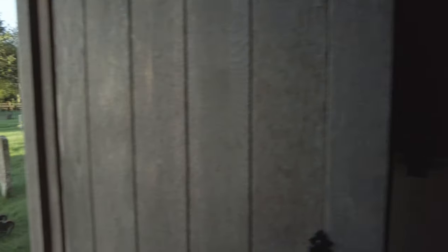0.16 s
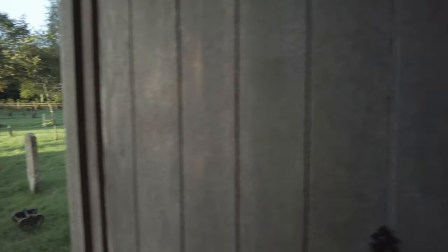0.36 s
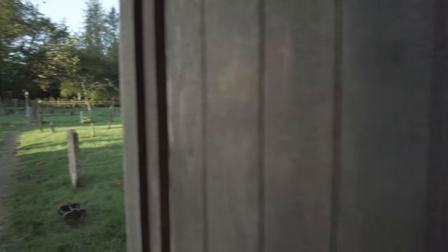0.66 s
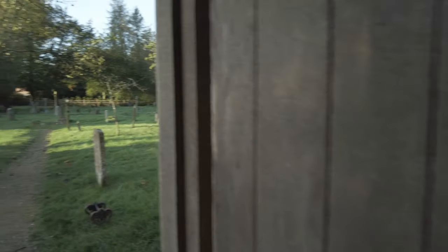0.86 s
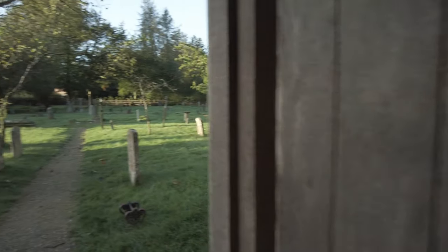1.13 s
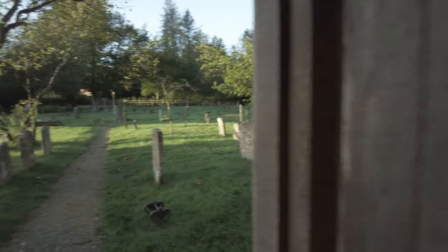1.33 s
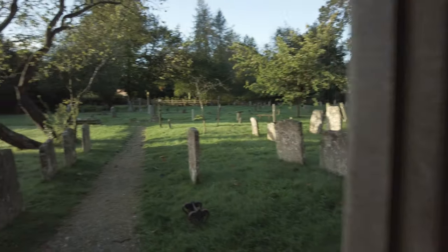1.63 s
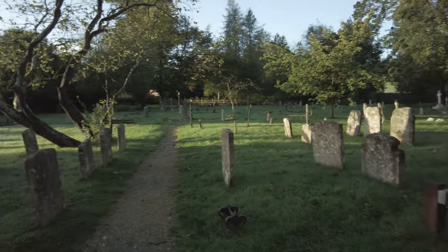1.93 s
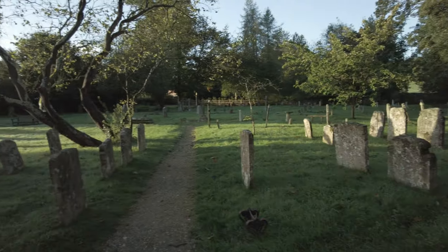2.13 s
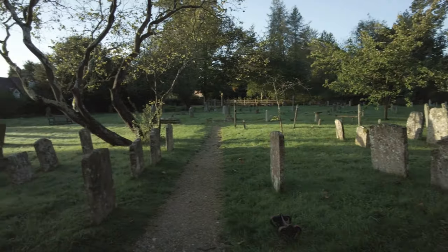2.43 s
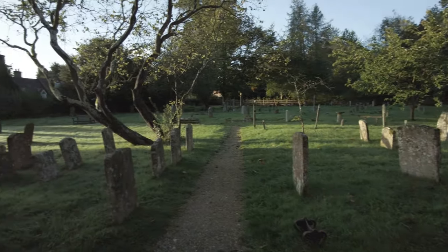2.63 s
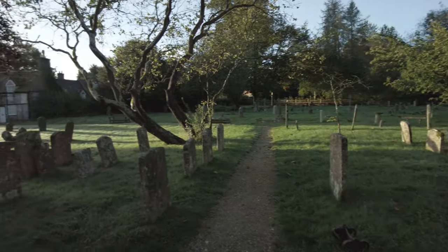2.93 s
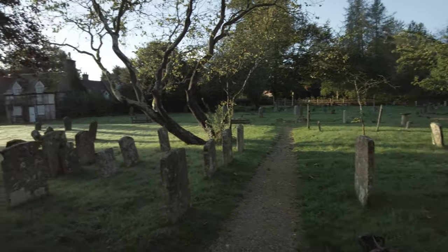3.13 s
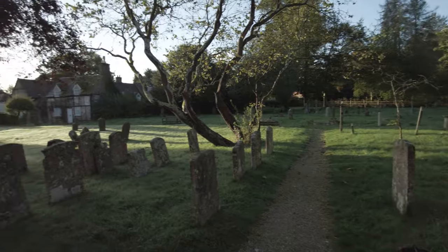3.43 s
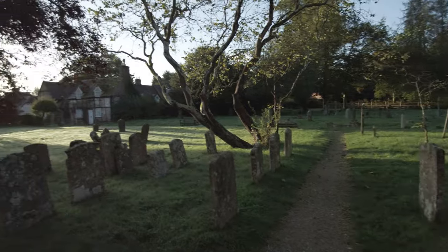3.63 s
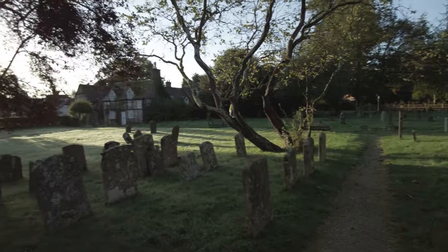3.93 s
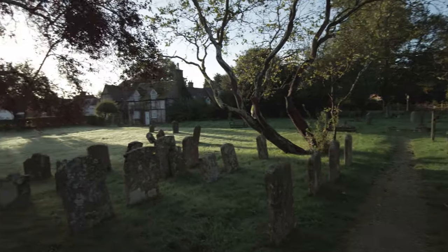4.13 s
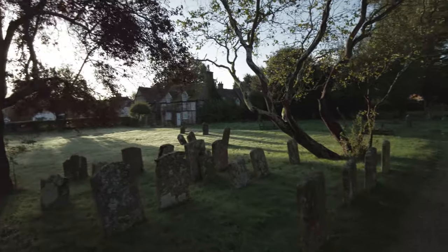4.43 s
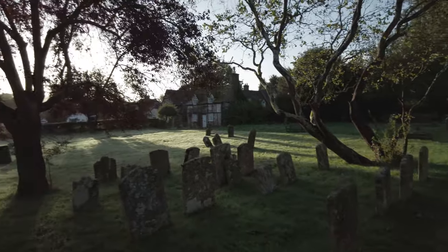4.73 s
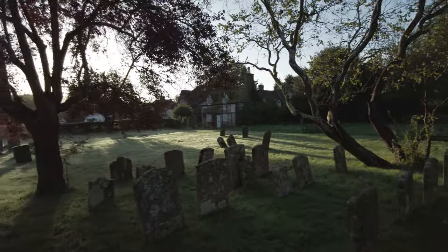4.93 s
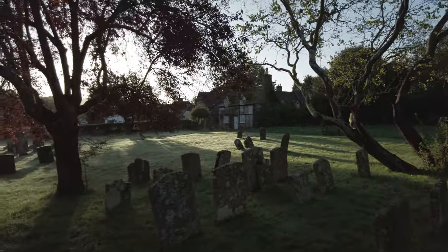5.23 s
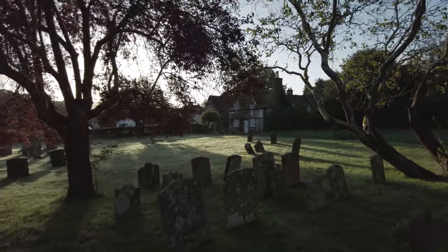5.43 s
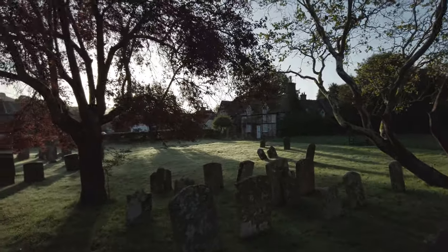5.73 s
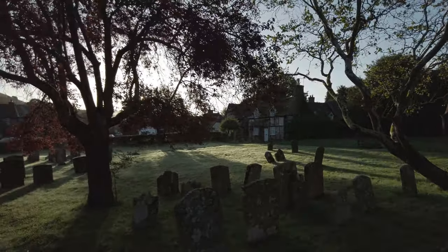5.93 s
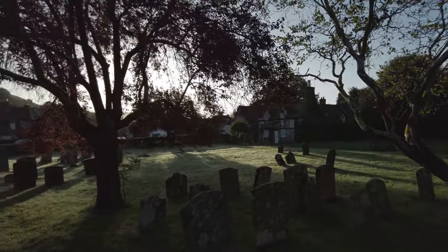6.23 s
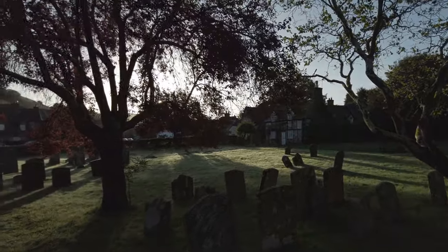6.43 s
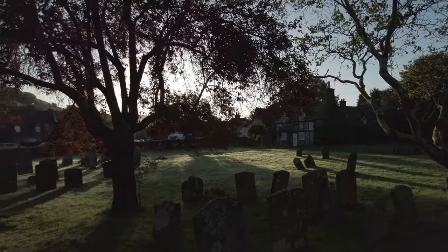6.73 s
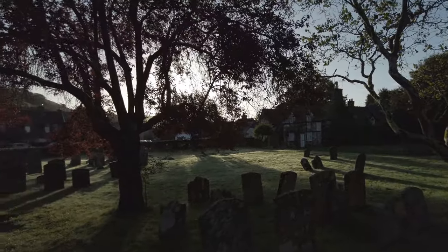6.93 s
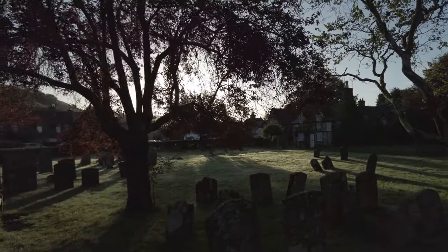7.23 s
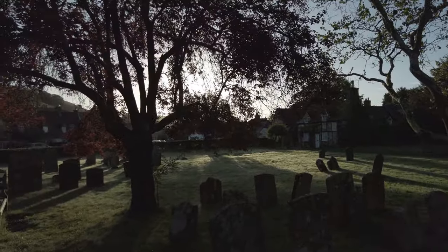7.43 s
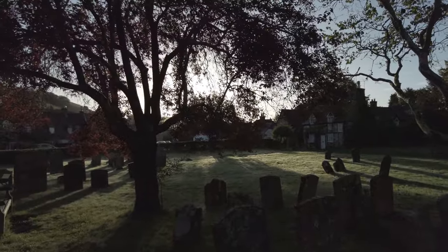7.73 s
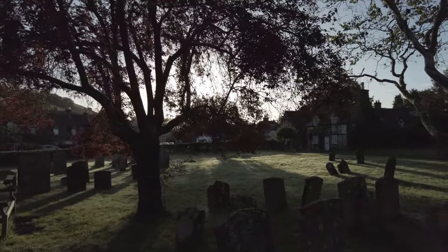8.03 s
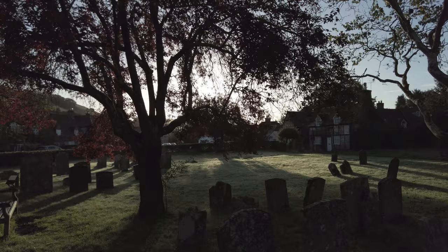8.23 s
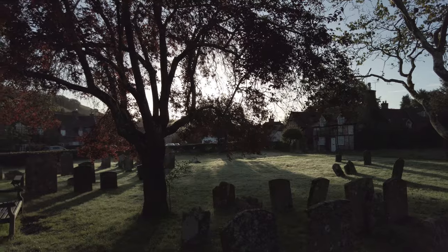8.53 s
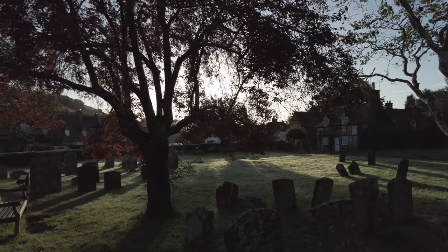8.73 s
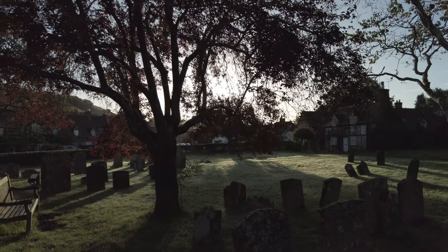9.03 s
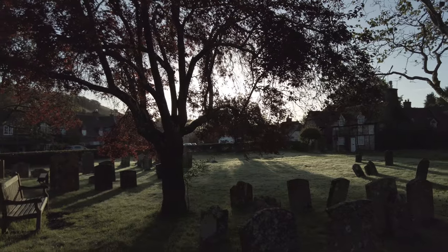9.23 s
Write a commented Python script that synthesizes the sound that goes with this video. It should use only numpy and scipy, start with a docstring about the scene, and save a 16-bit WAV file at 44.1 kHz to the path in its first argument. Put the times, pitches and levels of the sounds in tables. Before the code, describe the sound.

Small birds chirp, trill and whistle throughout in a quiet village churchyard, one nearer bird repeating a high double note. Rooks caw farther off and a pigeon coos very faintly midway, over a steady low rumble of distant traffic. Close to the hand-held microphone, sleeves rustle softly, two dull footsteps thud early on, and the plastic camera body gives a few sharp knocks, loudest near three and eight seconds.

```python
"""Small birds whistle and trill in a churchyard at dawn, and one repeats a loud double note.
Each whistle is a gliding sine tone, roughened by amplitude modulation and scattered by the trees.
Far off, rooks caw in harmonics shaped by the throat, a pigeon coos and traffic rumbles as low noise.
Close by, steps thud, sleeves rustle and the plastic shell of a hand-held camera rings when knocked."""
import sys
import numpy as np
from scipy import signal
from scipy.io import wavfile
from scipy.ndimage import uniform_filter1d

SR = 44100
rng = np.random.default_rng(int(sys.argv[2]) if len(sys.argv) > 2 else 0)


def file_out(sig):
    """Save sig as 16-bit WAV at sys.argv[1]."""
    # one column per channel
    cols = np.atleast_2d(sig).T
    # limit, then scale
    lim = np.clip(cols, -1, 1)
    pcm = np.round(lim * 32767).astype(np.int16)
    wavfile.write(sys.argv[1], SR, pcm)


N = 413216

# distant traffic: time_s, rumble_db, drone_db, hum_db
TRAFFIC_LEVELS = [(0.0, -56, -56.5, -66), (.9, -52.5, -53.5, -62), (2.0, -44.5, -56.5, -58),
                  (2.7, -43.5, -53.5, -53.5), (3.8, -46.5, -53, -57.5), (4.6, -47, -54.5, -57.5),
                  (5.3, -49, -55.5, -64), (6.2, -43.5, -54, -65), (6.94, -44.5, -64, -65),
                  (8.3, -45.5, -60.5, -64), (9.37, -47, -61, -59)]
HALF_EACH_SIDE = np.array([[.5], [-.5]])  # splits a left-right difference between the channels


def gain_of(db):
    """Amplitude ratio: a factor of ten for every 20 dB."""
    return 10 ** (np.asarray(db) / 20)


def unit_rms(x):
    """Normalisation to a mean power of one."""
    return x / np.sqrt(np.mean(x ** 2) + 1e-20)


def spectrum_at(points, hz):
    """Interpolation on a logarithmic frequency axis."""
    points_hz, value = np.transpose(points)
    return np.interp(np.log(hz + 1), np.log(points_hz + 1), value)


def curve(rows, column):
    """Linear interpolation of one column over time."""
    rows = np.array(rows)
    return np.interp(np.arange(N) / SR, rows[:, 0], rows[:, column])


def add(mix, start_s, sound):
    """Superposition: a sound adds to the stereo mix from start_s on."""
    part = mix[:, round(start_s * SR):][:, :sound.shape[-1]]
    part += sound[..., :part.shape[1]]


def wobble(size, cutoff_hz):
    """Random modulator: low-passed noise of rms 1."""
    lowpass = signal.butter(N=2, Wn=cutoff_hz, fs=SR)
    return unit_rms(signal.lfilter(*lowpass, rng.standard_normal(size + 4000))[4000:])


def rasp(size, depth):
    """Roughness: fast, uneven amplitude modulation."""
    return unit_rms(1 + depth * wobble(size, cutoff_hz=350))


def noise(layers, size):
    """Partly coherent stereo noise; layers (spectrum, level_db, patchy_db, flicker_db) add in power."""
    # likeness of left and right: frequency_hz, correlation
    coherence = [(60, 0.88), (120, 0.98), (240, 0.86), (480, 0.53), (950, -0.45), (1890, 0.89),
                 (3770, -0.49), (7520, 1), (15000, 1)]
    hop = size // 4
    frames, hz = N // hop + 5, np.fft.rfftfreq(size, 1 / SR)
    power = 0
    for spectrum, level_db, patchy_db, flicker_db in layers:
        patches = rng.standard_normal((len(hz), frames), np.float32)
        patches = uniform_filter1d(patches, size=10, axis=0)
        patches = unit_rms(uniform_filter1d(patches, size=12, axis=1))
        flicker = unit_rms(uniform_filter1d(rng.standard_normal(frames), size=5))  # common to all bands
        level = gain_of(np.resize(level_db, N)[np.minimum(np.arange(frames) * hop, N - 1)])
        shape_db = spectrum_at(spectrum, hz)[:, None] + patchy_db * patches + flicker_db * flicker
        power = power + (level * unit_rms(gain_of(shape_db))) ** 2
    a, b, c, d = rng.standard_normal((frames, len(hz), 4)).T
    correlation = np.clip(spectrum_at(coherence, hz), -.98, .98)[:, None]
    left = a + 1j * b
    right = correlation * left + np.sqrt(1 - correlation ** 2) * (c + 1j * d)
    spectra = np.sqrt(power) * np.array([left, right])
    return signal.istft(spectra, nperseg=size, noverlap=size - hop)[1][:, :N] / np.sqrt(size / 3)


def whistle(hz, db, pan_db, lead_us, flutter, waver_hz):
    """A sine modulated in level and pitch, placed by the left channel's lead in level and time."""
    size = len(hz)
    cycles = np.cumsum(hz + waver_hz * wobble(size, 90)) / SR + HALF_EACH_SIDE * hz * lead_us * 1e-6
    swell = np.interp(np.linspace(0, 1, size), [0, .12, .8, 1], [.69, .69, .81, .32])
    envelope = swell * signal.windows.tukey(size, .15) * (1 + flutter * wobble(size, 52))
    return np.sqrt(2) * gain_of(db + pan_db * HALF_EACH_SIDE) * envelope * np.sin(2 * np.pi * cycles)


def scatter(x, t60_s):
    """Reverberation: dense echoes from trees, walls and stones decay exponentially."""
    size = SR // 2
    taps = np.zeros((2, size))
    delays = np.arange(700, size - 20, 20) + rng.integers(0, 20, (2, (size - 701) // 20))
    np.put_along_axis(taps, delays, rng.choice([-1., 1.], delays.shape), 1)
    tail = taps * gain_of(-60 * np.arange(size) / SR / t60_s)
    return signal.fftconvolve(x, tail / np.linalg.norm(tail[0]), axes=1)[:, :N]


def ambience():
    """Incoherent sources merge into noise: a blur of far birds over the hiss of the air."""
    # far chorus: frequency_hz, density_db
    chorus_spectrum = [(1500, -1), (2200, 1), (2900, 5.5), (4500, 2), (6300, -6.5), (7500, -12),
                       (9000, -16)]
    # its loudness: time_s, level_db
    chorus_levels = [(0, -70), (.6, -77.5), (.64, -65.5), (1.5, -68), (1.58, -64.5), (2.3, -65), (2.8, -75),
                     (3.7, -67.5), (4.8, -72), (5.6, -71), (6.1, -78.5), (6.17, -69), (6.95, -69.5),
                     (7.05, -78.5), (7.28, -71), (8.45, -77.5), (8.95, -68), (9.37, -75.5)]
    # open air: frequency_hz, density_db
    air_spectrum = [(150, -20), (250, -7), (647, -11.5), (1130, -14), (1590, -13), (2250, -29.5),
                    (7810, -23.5), (13600, -41), (15600, -24)]
    chorus = (chorus_spectrum, curve(chorus_levels, 1), 3., .8)
    return noise([chorus, (air_spectrum, -73.5, 1.2, .8)], size=1024)


def road():
    """Distant traffic as two bands of low-frequency noise that swell and fade."""
    # deep drone: frequency_hz, density_db
    drone_spectrum = [(12, -11.5), (22, 0), (32, -8), (75, -6.5), (100, 6.5), (135, -2), (170, -26.5),
                      (250, -53)]
    # road hum: frequency_hz, density_db
    hum_spectrum = [(110, -31), (150, 0.5), (190, 1.5), (250, -6.5), (330, -17.5), (500, -18), (620, -41),
                    (900, -52.5)]
    drone = (drone_spectrum, curve(TRAFFIC_LEVELS, 2), 1.8, .3)
    hum = (hum_spectrum, curve(TRAFFIC_LEVELS, 3), 2.2, .8)
    return noise([drone, hum], size=2048)


def engines():
    """Narrow-band noise: a low, drifting carrier varies randomly in amplitude and phase."""
    # centre of the rumble: time_s, pitch_hz
    pitches = [(0, 62.2), (1.5, 54.72), (4, 48.11), (5.5, 45), (7, 49.52), (9.37, 47.33)]
    carrier = np.exp(2j * np.pi * np.cumsum(curve(pitches, 1)) / SR)
    modulator = wobble(N, 11) + 1j * wobble(N, 11)
    rumble = unit_rms((carrier * modulator).real) * gain_of(-1.2 * HALF_EACH_SIDE)
    antiphase = gain_of(-27) * wobble(N, 77) * [[1], [-1]]
    return gain_of(curve(TRAFFIC_LEVELS, 1)) * (rumble + antiphase)


def footsteps():
    """Heavy steps thud through the ground as damped low oscillations."""
    # steps: start_s, pitch_hz, level_db
    thuds = [(2.551, 86, -46), (2.78, 84, -44)]
    out, t = np.zeros((2, N)), np.arange(SR // 4) / SR
    for start_s, hz, db in thuds:
        envelope = gain_of(db) * t / .022 * np.exp(1 - t / .036)
        add(out, start_s, envelope * np.sin(2 * np.pi * hz * t))
    return out


def rubbing():
    """Friction noise: dull scuffs start abruptly, dry swishes swell and die symmetrically."""
    # feet and hands: start_s, level_db, fade_db_per_s
    scuffs = [(0, -65, 153), (.63, -67.5, 17), (1.5, -65.5, -1), (2.25, -60.5, 45), (2.54, -63, 22),
              (3.62, -65.5, 6), (4.92, -72.5, 7), (6.15, -67, 17), (6.7, -79, 57), (7.26, -73.5, 2),
              (9.0, -75.5, -12)]
    # their timbre: frequency_hz, density_db
    scuff_spectrum = [(250, -2.5), (450, 2), (800, 1), (1150, 0), (1500, 4.5), (2200, -12.5), (3500, -12.5),
                      (6000, -58)]
    # sleeves: middle_s, level_db, half_length_s
    swishes = [(0, -81, 0.62), (0.86, -76.5, 0.41), (1.955, -87, 0.48), (2.276, -67, 0.17),
               (3.68, -83, 0.088), (4.5, -99, 0.26), (4.824, -75.5, 0.18), (5.613, -74.5, 0.078),
               (6.2, -79, 0.049), (6.522, -76, 0.046), (7.202, -80, 0.21), (7.475, -71.5, 0.05),
               (8.756, -81.5, 0.59)]
    # their timbre: frequency_hz, density_db
    swish_spectrum = [(700, -20), (1500, -8), (3000, -8), (6000, -12), (10000, -13), (15500, -12)]
    t = np.arange(N) / SR
    scuff_length_s, swish_drop_db = .77, 13.5
    scuff = sum(gain_of(db - fade * (t - start_s)) * (t >= start_s) * (t < start_s + scuff_length_s)
                for start_s, db, fade in scuffs)
    swish = sum(gain_of(db - swish_drop_db * ((t - middle_s) / half_s) ** 2)
                for middle_s, db, half_s in swishes)
    scuff_db = 20 * np.log10(uniform_filter1d(scuff, size=1500) + gain_of(-79.5))
    swish_db = 20 * np.log10(swish + gain_of(-103))
    return noise([(swish_spectrum, swish_db, 1.5, 1.6), (scuff_spectrum, scuff_db, 2.2, 1.4)], size=256)


def knocks():
    """An impact excites two damped modes of the plastic shell, with a click and a dull rattle."""
    # knocks on the camera body: start_s, level_db, ring_hz, pan_db
    impacts = [(1.633, -46, 456, 4), (2.626, -29.5, 335, 5.5), (2.934, -31.5, 355, 6.5),
               (3.636, -50, 526, 4), (3.665, -44.5, 390, 5), (3.755, -38.5, 272, 1), (5.187, -50, 403, 5),
               (6.174, -37, 374, 3), (6.233, -56, 505, 5), (7.266, -37, 358, 8), (7.408, -43, 305, 2),
               (8.024, -42, 520, -8), (8.032, -32, 563, 4.5), (8.147, -48, 324, 4)]
    out, t = np.zeros((2, N)), np.arange(4000) / SR
    attack = 1 - np.exp(-(t / .00088) ** 2)
    for start_s, db, hz, pan_db in impacts:
        ring = np.sin(2 * np.pi * hz * t) * gain_of(-60 * t / .023)
        ring += .9 * np.sin(2 * np.pi * 1.81 * hz * t) * gain_of(-60 * t / .0032)
        click = uniform_filter1d(rng.standard_normal(len(t)), size=9) * gain_of(-61 - 60 * t / .022)
        rattle = .17 * np.array([wobble(len(t), 395), wobble(len(t), 970)]) * gain_of(-60 * t / .21)
        knock = attack * (gain_of(db) * (ring + rattle) + click)
        add(out, start_s, knock * gain_of(pan_db * HALF_EACH_SIDE))
    return out


def ticks():
    """Heavily damped transients: a noisy tone dies so fast that it is heard as a dry click."""
    # light ticks: start_s, level_db, centre_hz
    clicks = [(1.009, -56, 5960), (1.634, -47, 1780), (2.628, -50, 2000), (2.935, -41.5, 2100),
              (4.865, -61, 6600), (5.124, -55, 1985), (5.246, -43, 2300), (7.17, -62, 6500),
              (7.22, -61, 6500), (7.264, -65, 1200), (7.29, -64, 8000), (7.831, -50, 1500),
              (7.47, -52, 2700), (7.41, -44.5, 1570), (8.034, -34, 1260)]
    out, t = np.zeros((2, N)), np.arange(4000) / SR
    for start_s, db, hz in clicks:
        tick = (1 + 1.2 * wobble(len(t), .3 * hz)) * np.cos(2 * np.pi * hz * t)
        envelope = np.minimum(t / .0014, 1) * gain_of(db - 60 * t / .0089)
        add(out, start_s, tick / np.std(tick[:130]) * envelope)
    return out


def pigeon():
    """Soft low hoots: nearly pure tones on a shallow arch of pitch."""
    # hoots: start_s, length_s, pitch_hz, level_db
    coos = [(3.95, 0.19, 469, -74), (4.84, 0.13, 477, -71), (5.58, 0.088, 474, -68.5)]
    out = np.zeros((2, N))
    for start_s, length_s, hz, db in coos:
        arch = 1 + .027 * np.sin(np.linspace(0, np.pi, round(length_s * SR)))
        add(out, start_s, whistle(hz * arch, db, pan_db=0, lead_us=0, flutter=.19, waver_hz=5.7))
    return out


def rooks():
    """Source and filter: the throat shapes harmonics that an uneven beat of the folds chops up."""
    # caws, pitched by their third harmonic:
    # start_s, length_s, level_db, first_hz, top_hz, last_hz, peak_share, upper_lift_db
    caws = [(.76, 0.406, -65.5, 1250, 1331, 1291, 0.35, -1.5),
            (2.661, 0.3, -67.5, 1328, 1430, 1340, 0.57, 0), (2.899, 0.48, -61, 1369, 1426, 1225, 0.62, 2.5),
            (3.95, 0.38, -67, 1175, 1237, 1207, 0.61, -5.5), (4.3, 0.38, -68, 1253, 1355, 1283, 0.51, -1),
            (5.1, 0.26, -69, 1563, 1583, 1483, 0.33, -10),
            (5.3, 0.33, -66.5, 1188, 1317, 1189, 0.444, -1.5),
            (7.3, 0.39, -75.5, 1460, 1494, 1430, 0.33, 7), (9.071, 0.34, -68, 1140, 1201, 1186, 0.393, 1)]
    # throat resonance: frequency_hz, gain_db
    throat = [(800, -29), (1100, -1.5), (1400, 5), (1850, -4.5), (2300, -18.5), (2800, -33)]
    out = np.zeros((2, N))
    for start_s, length_s, db, first_hz, top_hz, last_hz, peak_share, lift_db in caws:
        size = round(length_s * SR)
        progress = np.linspace(0, 1, size)
        arch = np.sin(np.pi / 2 * np.interp(progress, [0, peak_share, 1], [0, 1, 2]))
        ends_hz = np.where(progress < peak_share, first_hz, last_hz)
        fundamental_hz = (ends_hz + (top_hz - ends_hz) * arch) / 3
        jitter = 1 + .033 * wobble(size, 70) + .015 * wobble(size, 4)
        phase = 2 * np.pi * np.cumsum(fundamental_hz * jitter) / SR
        voice = sum(gain_of(spectrum_at(throat, k * fundamental_hz) + lift_db * (k > 3))
                    * np.sin(k * phase) for k in range(2, 8))
        beat = 1 + .5 * np.sin(phase / 3) + .7 * wobble(size, 130)
        breath = wobble(size, 200) * np.sin(3.5 * phase)  # air noise between harmonics 3 and 4
        caw = unit_rms(unit_rms(voice * beat) + .3 * unit_rms(breath))
        effort_db = db + np.interp(progress, [0, peak_share, 1], [-1.5, 0, -1])
        add(out, start_s, caw * gain_of(effort_db) * signal.windows.tukey(size, .15))
    return out * gain_of(2 * HALF_EACH_SIDE)


def treetop_song():
    """Thin, far glides, broken up by the random modulation of leaves and moving air."""
    # high notes: start_s, length_s, first_hz, last_hz, level_db
    glides = [(2.791, .058, 8600, 8950, -82), (3.313, 0.085, 8540, 8000, -78),
              (3.525, 0.16, 8330, 7830, -76.5), (3.789, 0.07, 8470, 8400, -74),
              (3.82, 0.14, 8300, 8000, -78), (3.96, 0.074, 7580, 7780, -72.5),
              (4.185, 0.026, 6150, 6350, -77), (4.21, .06, 6900, 7250, -76), (4.31, 0.063, 7250, 7900, -76),
              (4.377, 0.073, 8000, 8000, -77), (4.507, .05, 7950, 7500, -80),
              (4.545, .065, 8080, 8250, -85), (6.606, 0.054, 7700, 7700, -84),
              (7.645, 0.097, 7950, 7900, -86), (7.777, 0.093, 7030, 7260, -77)]
    out = np.zeros((2, N))
    for start_s, length_s, first_hz, last_hz, db in glides:
        hz = np.linspace(first_hz, last_hz, round(length_s * SR))
        blur = .54 + wobble(len(hz), cutoff_hz=91)
        add(out, start_s, blur * whistle(hz, db, pan_db=0, lead_us=0, flutter=.12, waver_hz=60))
    return out


def trills():
    """Trains of 30 ms frequency sweeps, each falling steeply and levelling off."""
    # chips: start_s, top_hz, bottom_hz, level_db
    chips = [(.46, 6050, 4750, -59), (.538, 6500, 4800, -57), (.604, 6500, 4780, -59),
             (.667, 6250, 4800, -55), (.733, 6450, 4750, -59), (.818, 6500, 4650, -60),
             (.895, 6300, 5130, -60), (1.862, 6500, 5000, -61), (1.94, 6200, 4850, -64),
             (2.015, 6200, 5200, -60), (5.497, 5700, 4920, -58.5), (5.553, 5800, 4850, -64),
             (5.625, 5800, 5100, -63), (5.693, 6000, 4920, -64), (5.755, 5900, 4600, -60)]
    out = np.zeros((2, N))
    progress = np.linspace(0, 1, round(.03 * SR))
    fall = np.tanh(2.9 * progress ** 3.5) / np.tanh(2.9)
    shape_db = -6 * (1 - fall) - 16 * fall * (1 - fall)  # dips in mid-fall, swells at the low end
    for start_s, top_hz, bottom_hz, db in chips:
        hz = top_hz + (bottom_hz - top_hz) * fall
        roughness = rasp(len(hz), depth=.45)
        tone = whistle(hz, db + shape_db, pan_db=1, lead_us=-34, flutter=.22, waver_hz=60)
        add(out, start_s, roughness * tone)
    return out


def songbirds():
    """Short frequency glides that settle exponentially on their last pitch."""
    # whistled notes: start_s, length_s, first_hz, last_hz, level_db, left_lead_us
    notes = [(0.248, 0.03, 4620, 3930, -63, -40), (0.329, 0.023, 4760, 4730, -63, 31),
             (0.401, 0.038, 4740, 4380, -66, -13), (1.221, 0.08, 2390, 2810, -67, 9),
             (1.878, .03, 4050, 3720, -84, 0), (3.487, 0.046, 4970, 4590, -63, 51),
             (3.821, 0.035, 3140, 3190, -66, -120), (4.7, 0.024, 3880, 4860, -67, -32),
             (5.168, 0.018, 4050, 3900, -75, 0), (4.9, 0.018, 4020, 4010, -64, -52),
             (4.914, 0.033, 3360, 2800, -61.5, 154), (5.026, 0.03, 4050, 3830, -65, 12),
             (5.044, 0.036, 3260, 2460, -66, -32), (5.213, 0.03, 3220, 1950, -63.5, -24),
             (5.39, 0.11, 4440, 4770, -74, 0), (5.841, 0.027, 3840, 3810, -62, 88),
             (5.859, 0.021, 3300, 3030, -67, -30), (5.893, 0.045, 2490, 3720, -66, -140),
             (6.007, 0.024, 4430, 4900, -68, -7), (6.325, 0.088, 5270, 4890, -63.5, -11),
             (6.513, 0.036, 3580, 3330, -62, 112), (7.105, 0.078, 2420, 2900, -74, 112),
             (7.248, 0.045, 3430, 3240, -69, -150), (7.473, 0.064, 3460, 3190, -65, 104),
             (7.625, 0.0504, 4480, 4070, -64, -49), (7.684, 0.039, 4870, 4340, -67, -47),
             (7.759, .025, 4900, 4220, -73, -47), (7.92, 0.095, 4750, 4610, -70, -71),
             (7.99, 0.07, 3125, 2936, -63.5, -110), (8.42, .45, 1807, 1810, -81, 0),
             (8.883, .025, 4350, 4250, -68, 0), (8.854, 0.11, 6330, 6120, -64.5, 0),
             (8.96, 0.078, 4540, 4330, -64.5, 78), (8.902, 0.085, 3540, 3515, -66.5, -100),
             (9.077, 0.182, 2970, 3090, -74, 2), (9.094, 0.11, 4450, 4100, -61.5, 83),
             (9.287, 0.071, 3520, 3230, -65.5, -41)]
    out = np.zeros((2, N))
    rise_share, fall_s = .462, .0426
    for start_s, length_s, first_hz, last_hz, db, lead_us in notes:
        progress = np.linspace(0, 1, round(length_s * SR))
        decay = progress / rise_share if last_hz > first_hz else (progress * length_s / fall_s) ** 1.555
        remaining = np.exp(-decay)
        remaining = (remaining - remaining[-1]) / (1 - remaining[-1])
        hz = last_hz + (first_hz - last_hz) * remaining
        tone = whistle(hz, db, pan_db=.93, lead_us=lead_us, flutter=.34, waver_hz=56)
        add(out, start_s, tone * rasp(len(hz), depth=.4))
    return out


def scolds():
    """Ring modulation by noise smears a glide into a harsh band, broader for wider glides."""
    # scolding calls: start_s, length_s, first_hz, last_hz, level_db
    bursts = [(2.946, 0.22, 7020, 6800, -76), (3.16, .12, 7520, 6230, -70.5),
              (3.483, 0.11, 3980, 2910, -70), (6.107, 0.14, 2750, 2303, -63.5),
              (6.139, .16, 1835, 1454, -70), (6.69, 0.13, 1896, 1557, -67.5), (6.168, .14, 6480, 5740, -69),
              (6.658, 0.13, 2810, 1875, -63), (8.402, 0.048, 5270, 4960, -69.5),
              (8.45, 0.18, 7250, 6970, -70), (8.561, 0.084, 6420, 4000, -60.5),
              (8.695, 0.054, 8140, 6450, -65), (8.728, 0.12, 6430, 6300, -64.5),
              (8.83, 0.038, 7660, 7200, -67), (8.84, 0.031, 4440, 3750, -64.5),
              (8.984, 0.082, 7050, 5220, -63), (9.294, 0.086, 3360, 2434, -61)]
    out = np.zeros((2, N))
    for start_s, length_s, first_hz, last_hz, db in bursts:
        hz = np.linspace(first_hz, last_hz, round(length_s * SR))
        smear_hz = 280 + .13 * abs(last_hz - first_hz)
        harshness = wobble(len(hz), smear_hz) * np.hanning(len(hz)) ** .5
        tone = whistle(hz, db, pan_db=.71, lead_us=-37, flutter=.057, waver_hz=36.6)
        add(out, start_s, harshness * tone)
    return out


def slurs():
    """A near bird's smooth pitch contours, clear or hoarse according to the depth of modulation."""
    # one contour per whistle: time_s, pitch_hz, level_db
    contours = [
        [(.918, 4750, -66), (.93, 4400, -57.5), (.952, 3520, -60), (.968, 3120, -62), (.99, 2900, -58),
         (1.045, 3010, -63), (1.065, 3000, -65)],
        [(1.25, 2910, -65), (1.26, 2935, -54), (1.285, 3070, -59.5), (1.32, 3420, -62), (1.385, 3740, -61.5),
         (1.45, 3790, -69), (1.475, 3800, -66)],
        [(2.11, 4600, -68), (2.125, 4450, -58), (2.145, 3900, -61.5), (2.16, 3250, -68), (2.19, 2880, -67),
         (2.25, 2900, -68)],
        [(4.716, 5000, -72), (4.725, 4050, -64), (4.745, 3780, -66), (4.757, 4150, -64), (4.785, 3700, -68),
         (4.8, 2950, -70), (4.835, 2450, -71)],
        [(6.047, 4300, -61), (6.057, 4600, -54), (6.067, 4670, -58), (6.083, 4380, -51), (6.095, 4330, -72)],
        [(8.115, 3470, -76), (8.17, 3380, -72), (8.21, 3200, -68.5), (8.265, 3100, -70)],
    ]
    # hoarseness of each whistle: modulation_depth
    depths = .12, .1, 1., .6, .1, .7
    out = np.zeros((2, N))
    for contour, depth in zip(contours, depths):
        time_s, pitch_hz, level_db = np.transpose(contour)
        t = np.arange(time_s[0], time_s[-1], 1 / SR)
        hz = uniform_filter1d(np.interp(t, time_s, pitch_hz), size=300, mode="nearest")
        db = np.interp(t, time_s, level_db)
        tone = whistle(hz, db, pan_db=.9, lead_us=10, flutter=.35, waver_hz=20)
        add(out, time_s[0], tone * rasp(len(t), depth))
    return out


def double_note():
    """The near bird's drooping call: its warble sets a sideband above and below the carrier."""
    # notes: start_s, length_s, level_db, pan_db, left_lead_us, sag_hz
    notes = [(0, 0.084, -71, 5, 47, 70), (1.594, 0.13, -65, 0, 57, 9.5), (3.382, 0.17, -58, 0, 50, 31),
             (3.647, 0.11, -56, -1, 52, 170), (6.829, 0.16, -54.5, -0.5, 34, 52),
             (7.107, 0.14, -55.5, -2, 54, 200), (8.445, 0.14, -55, 5, -46, 61),
             (8.682, 0.125, -50.5, 3.5, -59, 71)]
    # course of a note: length_share, pitch_hz, warble_hz
    contour = [(0, 5694, 248), (.08, 5215, 340), (.25, 5150, 483), (.8, 5107, 596), (.9, 4910, 715),
               (1, 4700, 1000)]
    out = np.zeros((2, N))
    share, pitch_hz, warble_hz = np.transpose(contour)
    for start_s, length_s, db, pan_db, lead_us, sag_hz in notes:
        progress = np.linspace(0, 1, round(length_s * SR))
        remaining = 1 - progress
        hz = np.interp(progress, share, pitch_hz) + sag_hz * remaining
        spacing_hz = np.interp(progress, share, warble_hz) - sag_hz * remaining
        for side, side_db in ((0, 0), (1, -9.5), (-1, -26)):
            partial_db = db + side_db - 9 * progress ** 8 - (4 + 12 * abs(side)) * remaining ** 8
            tone = whistle(hz + side * spacing_hz, partial_db, pan_db, lead_us, flutter=.2, waver_hz=16)
            add(out, start_s, tone * rasp(len(hz), depth=.18))
        overtone_db = db - 31 - 12 * remaining ** 4
        for overtone_hz in (2 * hz, 2 * hz + spacing_hz):
            overtone = whistle(overtone_hz, overtone_db, pan_db, lead_us, flutter=.2, waver_hz=30)
            add(out, start_s, overtone)
    return out


def scene():
    """Direct and scattered birdsong over the background; farther birds have a larger share of echo."""
    near = double_note()
    small = songbirds() + scolds() + slurs()
    far = trills() + treetop_song()
    large = rooks() + pigeon()
    echoes = scatter(gain_of(-3) * small + gain_of(-3.5) * far + gain_of(-8) * near, t60_s=.85)
    boughs = scatter(gain_of(-8) * small + gain_of(-5) * far + gain_of(-11) * near, t60_s=.14)
    large_echoes = gain_of(.5) * scatter(large, t60_s=.57)
    birds = near + small + gain_of(-2) * far + large + boughs + echoes + large_echoes
    background = road() + ambience() + engines()
    return birds + background + footsteps() + rubbing() + knocks() + ticks()


def record(dry):
    """Band limiting: a steep linear-phase low-pass removes the highest treble."""
    cutoff_hz = 15750
    lowpass = signal.firwin(1023, cutoff_hz, window=("kaiser", 9), fs=SR)
    return signal.oaconvolve(dry, lowpass[None], "same")


dry = scene()
out = record(dry)
file_out(out)
```